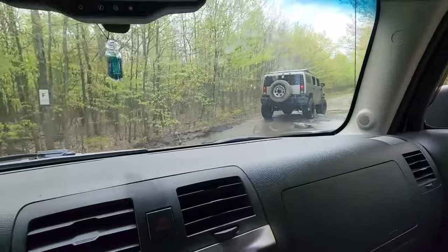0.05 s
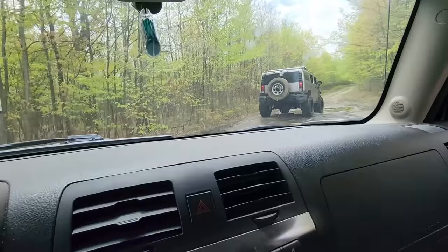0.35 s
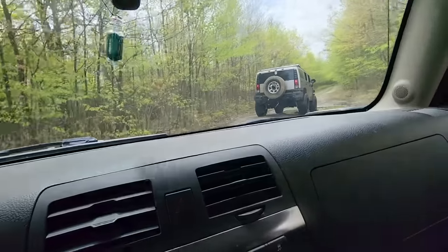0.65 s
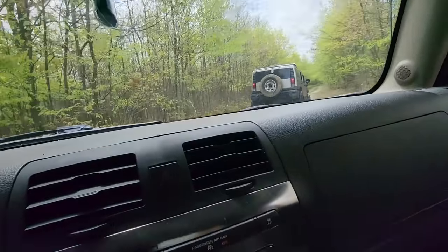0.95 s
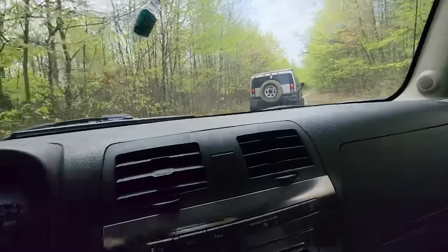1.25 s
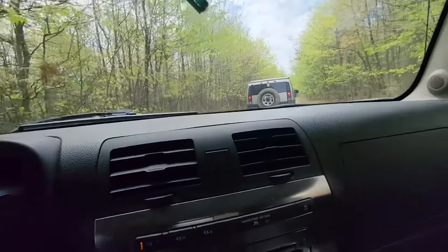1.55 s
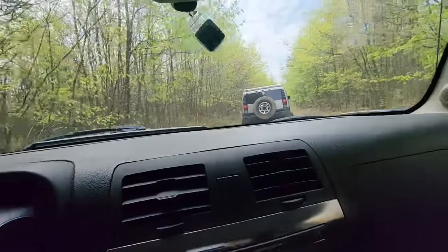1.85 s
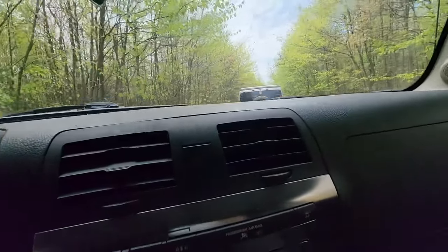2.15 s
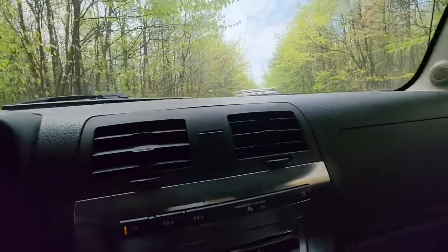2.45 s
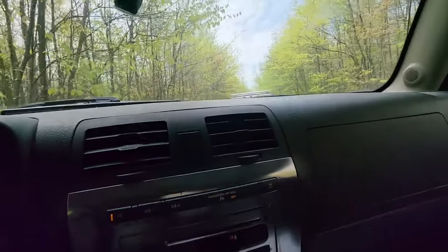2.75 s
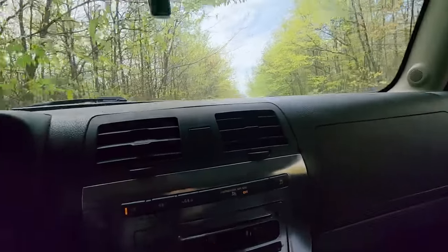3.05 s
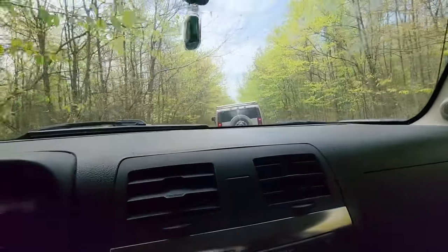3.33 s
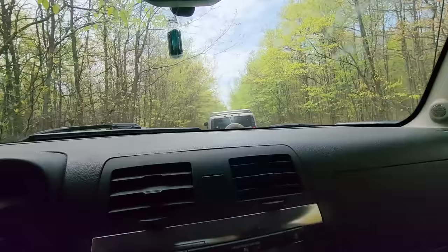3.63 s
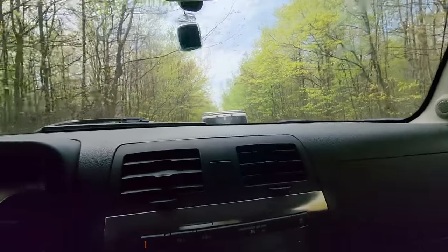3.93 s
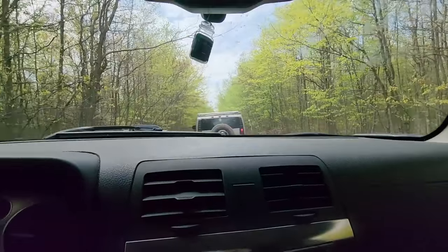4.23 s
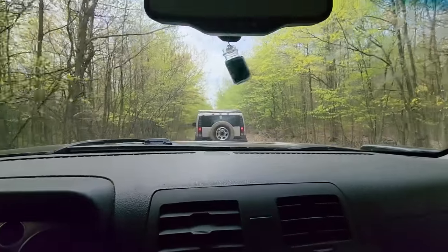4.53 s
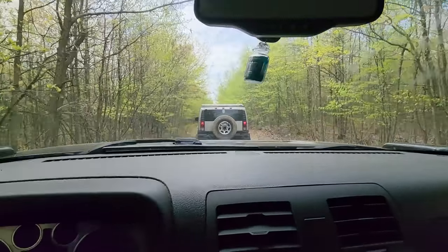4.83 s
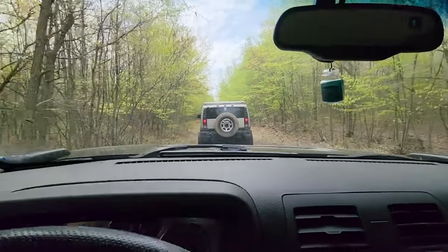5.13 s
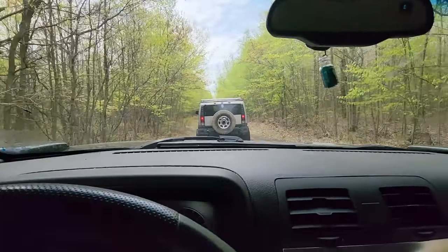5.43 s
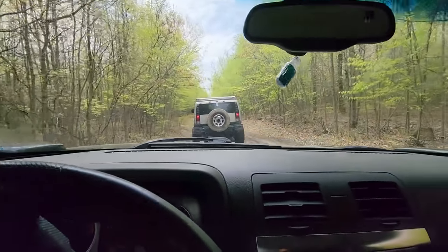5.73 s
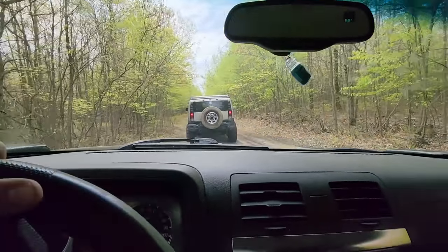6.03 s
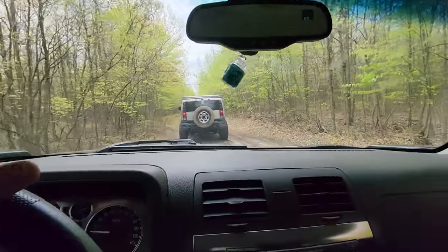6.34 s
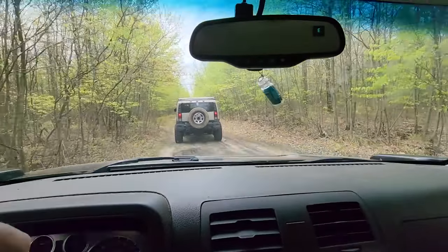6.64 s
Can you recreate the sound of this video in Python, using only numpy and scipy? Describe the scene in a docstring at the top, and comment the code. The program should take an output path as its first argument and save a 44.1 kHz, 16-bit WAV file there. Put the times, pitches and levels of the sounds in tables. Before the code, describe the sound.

A stereo microphone at the front seats of an SUV hears a low engine boom, body rumble and water sloshing and spraying in the wheel arches from the start. The engine surges around 1.2 seconds and again near 2.4. A heavy thump lands at 0.7 seconds, followed by a cluster of jolts between 1.2 and 1.7, with a sharp mud smack, trim knocks and metal clinks. More mud hits the panels between 2.2 and 2.5 seconds, and a loose metal piece clinks near 3.4. From about 3.8 to 4.8 seconds the spray thins into quieter gravel crunch, and a low, wavering tyre hum comes in as the engine eases. Thumps and hollow knocks return around 5.4 seconds, with another knock at 6, scattered light clinks, and a last strong bump near 6.8.

```python
"""A stereo microphone at the front seats of an SUV that wades through a muddy puddle onto a gravel trail.
From the start the engine booms in the cabin, the body rumbles and water washes over the wheel arches.
Bumps soon thump the body, mud smacks the panels, a loose metal piece clinks and the trim knocks.
From about four seconds the spray thins out into tyre crunch and the tread hums on firm ground,
with more bumps and rattles along the way."""
import sys
import numpy as np
from scipy import signal
from scipy.fft import rfft, irfft, next_fast_len
from scipy.io import wavfile
from scipy.ndimage import uniform_filter1d, map_coordinates

SR = 44100
rng = np.random.default_rng(int(sys.argv[2]) if len(sys.argv) > 2 else 0)


def unload_audio(sound):
    """Save the sound as a 16-bit wav file, at the path given as the first command line argument."""
    columns = np.transpose(np.atleast_2d(sound))
    # keep every value between -1 and 1, then stretch to whole-number steps
    steps = np.round(np.clip(columns, -1, 1) * 32767)
    wavfile.write(sys.argv[1], SR, steps.astype(np.int16))


N = 298998

# roughness of the track, worst in the rut of the puddle: (time [s], level [dB])
TRACK_ROUGHNESS = [(0, 0), (1.0, 2), (1.2, 5), (1.72, 5.5), (2.1, -1.5), (2.75, 0.5), (3.6, -3), (5.4, -3),
                   (5.75, 0), (6.4, -4), (6.78, -0.5)]
SHORE_S, LEAVE_S = 3.797, 0.98  # the tyres start to leave the water, and take this long


def amp(db):
    """Decibels to gain."""
    return 10 ** (np.asarray(db) / 20)


def unit(x):
    """Scale to rms 1."""
    return x / np.sqrt(np.mean(x ** 2) + 1e-20)


def along(points, hz):
    """(Hz, value) points read on a log axis."""
    f, v = np.transpose(points)
    return np.interp(np.log(hz + 1), np.log(f + 1), v)


def curve(points):
    """(time, value) points read at every sample."""
    return np.interp(np.arange(N) / SR, *np.transpose(points))


def ramp(start, length):
    """Rises from 0 to 1 over length seconds."""
    return np.clip((np.arange(N) / SR - start) / length, 0, 1)


def wobble(rate):
    """A smooth random curve, rate knots a second."""
    return map_coordinates(rng.standard_normal(int(N * rate / SR) + 4), [np.arange(N) * rate / SR])


def filtered(x, response):
    """Filter x by a response of frequency."""
    n = x.shape[-1]
    m = next_fast_len(n + 8192)
    return irfft(rfft(x, m) * response(np.fft.rfftfreq(m, 1 / SR)), m)[..., :n]


def spread(pair, spectrum):
    """Two unrelated signals become a coloured stereo field, rms 1, that reaches the left port first."""
    # likeness of the two microphone ports: (frequency [Hz], correlation [0-1])
    likeness = [(60, .992), (130, .97), (290, .8), (640, .5), (1300, .6), (2500, .4), (7000, .28),
                (15000, .2)]

    def colour(hz):
        turn = np.arccos(np.clip(along(likeness, hz), -1, 1)) / 2
        return amp(along(spectrum, hz)) * np.array([np.cos(turn), np.sin(turn)])

    def left_first(hz):
        lead_s = along([(500, 0.0000084), (1200, 0.0004545)], hz)
        return np.exp(1j * np.outer([1, -1], np.pi * hz * lead_s))

    mid, side = filtered(pair, colour)
    return unit(filtered(np.array([mid + side, mid - side]), left_first))


def rush(patchy_db):
    """Two noises with patches of random gain in time and frequency."""
    z = signal.stft(rng.standard_normal((2, N)), nperseg=512)[2]
    patches = uniform_filter1d(rng.standard_normal(z.shape[1:]), size=7, axis=0)
    patches = unit(uniform_filter1d(patches, size=9, axis=1))
    return unit(signal.istft(z * amp(patchy_db * patches), nperseg=512)[1][:, :N])


def grains(count, centre_hz, octaves, cycles, size_db):
    """Two streams of tiny damped rings of random pitch and size, rms 1."""
    start = rng.integers(0, 2 * N, (count, 1))
    hz = np.clip(centre_hz * 2 ** (octaves * rng.standard_normal((count, 1))), 100, SR / 3)
    size = amp(size_db * np.minimum(rng.exponential(size=(count, 1)), 4))
    k = np.arange(256)
    rings = size * np.sqrt(hz) * np.sin(2 * np.pi * hz * k / SR) * np.exp(-hz * k / SR / cycles)
    return unit(np.bincount((start + k).ravel(), rings.ravel(), 2 * N)[:2 * N].reshape(2, N))


def ring(modes, attack):
    """One blow on a set of modes, neighbours in opposite phase, each at a slightly new strength; peak 1."""
    t = np.arange(SR // 3) / SR
    scatter_db = rng.standard_normal(len(modes))
    y = sum((-1) ** k * amp(db + scatter_db[k] - 60 * t / t60) * np.sin(2 * np.pi * hz * t)
            for k, (hz, db, t60) in enumerate(modes))
    y *= 1 - np.exp(-t / attack)
    return y / np.abs(y).max()


def burst(spectrum, t60, attack):
    """A short stereo puff of coloured noise; peak 1."""
    t = np.arange(SR // 3) / SR
    envelope = amp(-60 * t / t60) * (1 - np.exp(-t / attack))
    y = envelope * spread(rng.standard_normal((2, len(t))), spectrum)
    return y / np.abs(y).max()


def add(track, s, sound):
    """Mix a sound into a stereo track at time s."""
    part = track[:, max(round(s * SR), 0):][:, :sound.shape[-1]]
    part += sound[..., :part.shape[1]]


def resonance(hz, centre_hz, width_hz):
    """Gain of one air resonance of the cabin at a moving frequency."""
    return 1 / np.hypot(1, 2 * (hz - centre_hz) / width_hz)


def engine():
    """Harmonics, roughened by uneven combustion, grow with effort and boom at the cabin's resonances."""
    # two surges through the mud, then a cruise: (time [s], firing rate [Hz])
    revs = [(0, 55.7), (.3, 48.77), (.85, 69.63), (1.25, 77.55), (1.65, 58.17), (2.1, 43.84), (2.5, 64.95),
            (2.7, 70.3), (3.08, 58.5), (3.75, 54.43), (4.25, 61.5), (4.9, 52.43), (5.55, 60.57), (6.78, 57)]
    # the driver pushes through the mud, then lifts off: (time [s], effort [dB])
    effort = [(0, -24.5), (.72, -17.5), (1.2, -14), (1.55, -26), (2.34, -11.5), (2.5, -17.5), (3.0, -19),
              (3.28, -14.5), (3.59, -15.5), (3.7, -23), (5.2, -24.5), (6.1, -33.5)]
    # weak upper harmonics: (multiple of the firing rate, level against the second [dB])
    overtones = [(3, -17.5), (4, -17), (5, -19)]
    hz = curve(revs)
    phase = 2 * np.pi * np.cumsum(hz) / SR
    fundamental = amp(0.94 * wobble(21.01)) * np.sin(phase + 0.17 * wobble(30))
    upper = np.sin(2 * phase + .25 * wobble(32))
    for k, db in overtones:
        upper += amp(db + 2.5 * wobble(9.8)) * np.sin(k * phase + wobble(22))
    boom = resonance(hz, centre_hz=53.2, width_hz=11.4) * fundamental
    drone = amp(-13) * resonance(2 * hz, centre_hz=132, width_hz=33) * upper
    return np.sqrt(2) * amp(curve(effort)) * (boom + drone)


def ride():
    """Rough ground sways the body and rumbles up through the suspension."""
    # spectra of the body's motion: (frequency [Hz], level [dB])
    sway_colour = [(8, 10.5), (18, 12.5), (28, 12.5), (42, 15.5), (60, 13), (85, 10), (150, -53.5)]
    rumble_colour = [(40, -15.5), (70, -6), (95, -1.5), (135, 5), (170, -5.5), (200, -7), (250, -12),
                     (310, -21), (400, -22), (800, -72)]
    rough_db = curve(TRACK_ROUGHNESS)
    sway = amp(-24.5 + 1.45 * rough_db) * spread(rng.standard_normal((2, N)), sway_colour)
    rumble = amp(-29.5 + rough_db) * spread(rng.standard_normal((2, N)), rumble_colour)
    return sway + rumble


def wash():
    """One flow drives slosh, spray and mist in the wheel arches; past the puddle, grit crunches instead."""
    # water and grit thrown by the tyres: (time [s], level [dB])
    flow = [(0.0, -37), (0.56, -34), (0.89, -36), (1.49, -36), (1.64, -35.5), (2.17, -34.5), (2.62, -39.5),
            (3.25, -40), (3.51, -42.5), (3.96, -41.5), (4.53, -47.5), (5.25, -48.5), (5.42, -50),
            (6.78, -50.5)]
    # spectra of the tyres in water: (frequency [Hz], level [dB])
    slosh_colour = [(150, -19), (245, 3.5), (305, 5.5), (400, -4), (510, 0.5), (640, -5), (740, -2.5),
                    (900, -8.5), (1300, -28), (3000, -51)]
    spray_colour = [(470, -20), (800, -2.5), (1000, 3.5), (1350, 2), (1700, -2.5), (1950, -2), (2220, -2),
                    (2550, -5.5), (3400, -4), (4200, -8), (5500, -7), (7200, -13), (8500, -46),
                    (11700, -57)]
    mist_colour = [(5000, -51), (7500, 5), (8700, -5.5), (10800, -3.5), (11600, 0), (15800, -1)]
    # spectra of the tyres on dry ground: (frequency [Hz], level [dB])
    ground_colour = [(150, -33), (250, -6.5), (340, 1.5), (430, -3), (550, 0), (700, -1), (830, -3),
                     (1000, -5.5), (1400, -13), (3000, -67)]
    crunch_colour = [(500, -1), (700, -15), (900, -5), (1350, 1.5), (1750, -5.5), (2150, -5.5),
                     (2700, -8.5), (3800, -11.5), (5500, -16), (7300, -19.5), (8300, -35.5), (11000, -60)]
    ashore = ramp(SHORE_S, LEAVE_S)
    in_water, on_land = np.sqrt(1 - ashore), np.sqrt(ashore)
    # the mist thickens as the arches get soaked, outlasts the shore, then fades
    soaked_db = 2 * ramp(0, 2.8) - 11 * ramp(SHORE_S + 0.39, 0.98)
    slosh_db = 2 + 0.31 * curve(TRACK_ROUGHNESS)
    surge = wobble(22.12) + wobble(7)  # water and grit come off the tread in sheets
    bubbles = grains(count=2500, centre_hz=670, octaves=0.77, cycles=0.69, size_db=2.5)
    drops = grains(count=9000, centre_hz=3690, octaves=1.0, cycles=1.07, size_db=-3.0)
    grit = grains(count=3000, centre_hz=2680, octaves=0.76, cycles=3.2, size_db=4.0)
    slosh = spread(rush(patchy_db=2.5) + 0.096 * bubbles, slosh_colour)
    ground = spread(rush(patchy_db=3.0), ground_colour)
    spray = spread(rush(patchy_db=1.4) + 0.29 * drops, spray_colour)
    crunch = spread(rush(patchy_db=2.24) + 0.16 * grit, crunch_colour)
    mist = spread(rush(patchy_db=1.5) + 0.46 * drops, mist_colour)
    low = amp(0.2 * surge) * (amp(slosh_db) * in_water * slosh + amp(2.5) * on_land * ground)
    thrown = amp(4.5 + 0.41 * surge) * (in_water * spray + on_land * crunch)
    high = amp(-8 + soaked_db + .5 * surge) * mist
    return amp(curve(flow)) * (low + thrown + high)


def swishes():
    """Narrow swells of hiss rise and fall over the wash."""
    # brief swells: (time [s], length [s], relative level [dB], centre [Hz])
    swells = [(0.236, .12, -32.5, 2370), (0.469, 0.078, -33, 2300), (1.004, 0.097, -37, 2180),
              (1.122, .1, -42, 7000), (1.531, 0.068, -31.5, 4070), (2.287, 0.069, -32, 3030),
              (3.111, .14, -43, 5000), (3.85, 0.013, -37, 5450), (3.88, 0.098, -33, 1120),
              (6.367, .08, -56, 5770)]
    out = np.zeros((2, N))
    for s, length, db, hz in swells:
        swell = signal.windows.hann(round(length * SR))
        band = [(hz / 4, -45), (hz / 2, -14), (hz, 0), (hz * 2, -20), (hz * 4, -50)]
        add(out, s, amp(db - 1.5) * swell * spread(rng.standard_normal((2, len(swell))), band))
    return out


def bumps():
    """The suspension passes each jolt to the body's low modes, and again, softer, as it springs back."""
    # jolts from the track: (time [s], peak [dB])
    jolts = [(0.696, -5.5), (1.198, -9.5), (1.353, -8), (1.463, -4.5), (1.648, -4), (2.386, -11.5),
             (3.433, -25), (4.09, -24), (5.374, -19), (5.528, -11), (6.754, -6.5)]
    # modes of the body: (frequency [Hz], level [dB], t60 [s])
    body_modes = [(65.8, -7.5, 0.33), (113.7, 3, 0.064), (141, 5.5, 0.073), (186, -2.5, 0.031),
                  (233, -5, 0.032), (310, -20, 0.043)]
    rebound_s, rebound_db = .041, -7.5
    out = np.zeros((2, N))
    for s, db in jolts:
        add(out, s, amp(db) * ring(body_modes, attack=0.0029))
        add(out, s + rebound_s, amp(db + rebound_db) * ring(body_modes, attack=0.0029))
    return out


def mud_smacks():
    """Mud and pebbles smack the panels outside, some dull, some bright."""
    # impacts: (time [s], peak [dB], tilt [dB per octave])
    smacks = [(1.033, -20, -2.5), (1.486, -7, 0.8), (1.496, -20, -10), (2.167, -15, 0), (2.314, -22, 1),
              (2.475, -18.5, -6), (3.855, -20.5, 1)]
    # spectrum of an impact: (frequency [Hz], level [dB])
    colour = [(500, -28), (1200, 9), (2100, 2), (3000, -4), (4500, -3), (6500, -4), (9000, -19.5),
              (15000, -14)]
    out = np.zeros((2, N))
    for s, db, tilt in smacks:
        tilted = [(hz, level + tilt * np.log2(hz / colour[0][0])) for hz, level in colour]
        add(out, s, amp(db) * burst(tilted, t60=.04, attack=.002))
    return out


def metal_clinks():
    """A loose metal piece scrapes and rings at each contact."""
    # contacts: (time [s], ring peak [dB], scrape against the ring [dB])
    contacts = [(1.285, -27, 7.5), (1.487, -28, 4), (3.354, -22.5, -2), (4.32, -31, 4.5), (5.036, -25, -2),
                (5.316, -35, -1), (5.85, -26.5, -1), (6.492, -30.5, 3)]
    # modes of the piece: (frequency [Hz], level [dB], t60 [s])
    metal_modes = [(1450, -9, .05), (1930, -3, .1), (2010, -4, .085), (2880, -1, .06), (3010, 0, .07),
                   (3500, -9, .05), (4150, -6, .06), (4850, -6, .06), (6300, -11, .05)]
    # spectrum of the scrape: (frequency [Hz], level [dB])
    scrape_colour = [(600, -5), (1300, 9.5), (3000, 0), (5000, -5.5), (7300, -12), (8400, -38),
                     (15000, -40)]
    out = np.zeros((2, N))
    for s, db, scrape_db in contacts:
        clink = ring(metal_modes, attack=.002)
        scrape = amp(scrape_db) * burst(scrape_colour, t60=0.049, attack=0.0016)
        add(out, s, amp(db) * (clink + scrape))
    return out


def trim_knocks():
    """Stones and trim knock: the contact cracks and the trim rings hollowly."""
    # knocks: (time [s], crack peak [dB], hollow ring peak [dB])
    knocks = [(1.46, -13.5, -26), (1.652, -12.5, -31), (2.779, -21, -26), (2.896, -30, -28),
              (3.931, -27.5, -45), (4.089, -28, -36), (4.233, -33, -34), (5.343, -21, -19),
              (5.38, -36, -29), (5.457, -31, -42), (6.046, -20.5, -16.5), (6.528, -30, -41),
              (6.672, -26.5, -40), (6.761, -28, -33)]
    # modes of the trim: (frequency [Hz], level [dB], t60 [s])
    trim_modes = [(250, -9, .08), (365, -9, .08), (500, -3, .075), (590, -2, .07), (695, 0, .085),
                  (742, -6, .07), (1270, -11, .055), (1420, -14, .05)]
    # spectrum of the crack: (frequency [Hz], level [dB])
    crack_colour = [(200, -16), (330, 7.5), (700, 3.5), (1000, -6), (1350, -0.5), (1800, -15), (2800, -18),
                    (6000, -23.5), (9000, -38.5), (15000, -37)]
    out = np.zeros((2, N))
    for s, crack_db, hollow_db in knocks:
        hollow = amp(hollow_db) * ring(trim_modes, attack=0.00061)
        crack = amp(crack_db) * burst(crack_colour, t60=0.056, attack=0.002)
        add(out, s, hollow + crack)
    return out


def tread():
    """Tread blocks hum on firm ground in two wavering lines, a fourth apart, that slowly fade."""
    # hum of the tread: (time [s], pitch [Hz])
    pitch = [(4.2, 125.2), (4.8, 134.5), (5.25, 129.8), (6, 133.7), (6.78, 124)]
    firm_for_s = np.maximum(np.arange(N) / SR - SHORE_S - LEAVE_S, 0)
    phase = 2 * np.pi * np.cumsum(curve(pitch)) / SR
    low = amp(1.8 * wobble(14)) * np.sin(phase + .35 * wobble(15))
    high = amp(1.8 * wobble(14)) * np.sin(phase * 4 / 3 + .35 * wobble(15))
    return ramp(SHORE_S, LEAVE_S) ** 2 * amp(-29 - 2.5 * firm_for_s) * (low + amp(-4.5) * high)


def cabin(x):
    """The padded cabin, close around the microphone, gives each channel its own short tail."""
    # decay of the cabin: (frequency [Hz], t60 [s])
    decay = [(100, 0.1), (1000, 0.064), (10000, 0.25)]
    hz, t, z = signal.stft(rng.standard_normal((2, SR // 5)), SR, nperseg=256)
    tail = signal.istft(z * amp(-60 * t / along(decay, hz)[:, None]), SR, nperseg=256)[1]
    return signal.fftconvolve(x, tail / np.linalg.norm(tail[0]), axes=1)[:, :N]


def scene():
    """Everything as it reaches the front seats; only the rattles get the cabin's tail."""
    rattles = trim_knocks() + metal_clinks() + mud_smacks()
    driving = engine() + tread() + ride() + wash() + swishes() + bumps()
    return driving + rattles + amp(-8.0) * cabin(rattles)


def record(dry):
    """Each microphone port has its own colour, the band ends steeply, and both ends fade very briefly."""
    # balance of the ports: (frequency [Hz], left minus right [dB])
    balance = [(60, -.6), (250, -1), (700, -2.8), (1300, -4), (2200, -7), (5000, -7.5), (6800, -5),
               (8000, 3), (8800, 6), (10500, 3), (12000, 0)]
    top_hz = 15850
    fade = signal.windows.tukey(N, .001)
    return filtered(dry * fade, lambda hz: amp(np.outer([1, -1], along(balance, hz) / 2)) * (hz < top_hz))


dry = scene()
out = record(dry)
unload_audio(out)
```